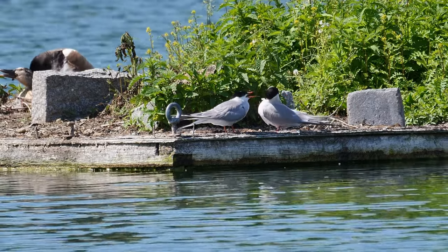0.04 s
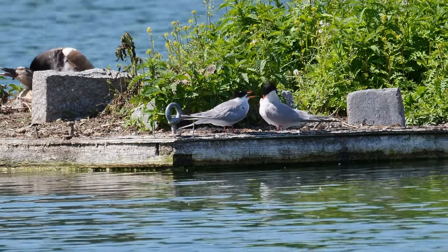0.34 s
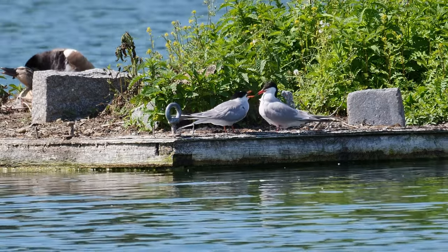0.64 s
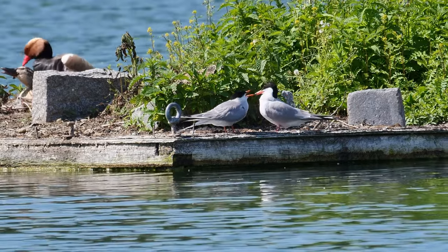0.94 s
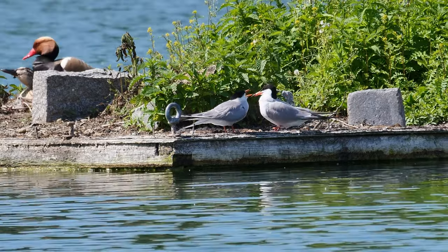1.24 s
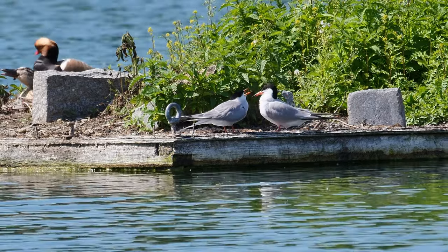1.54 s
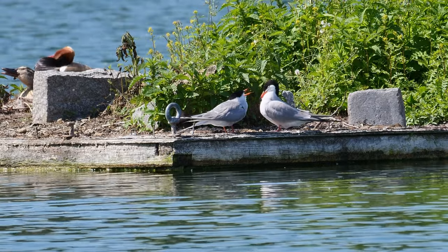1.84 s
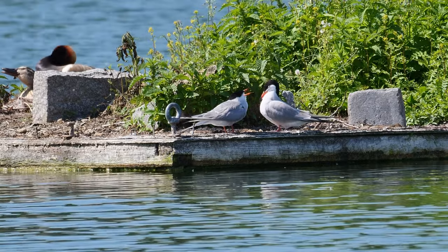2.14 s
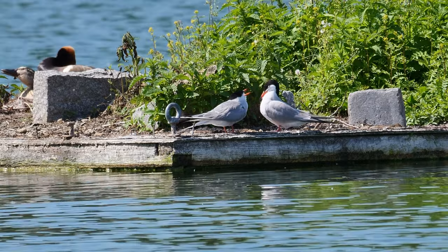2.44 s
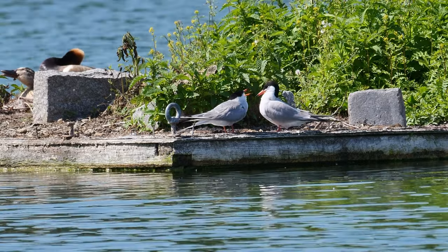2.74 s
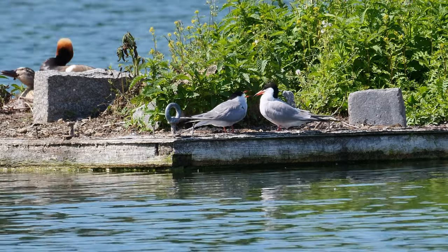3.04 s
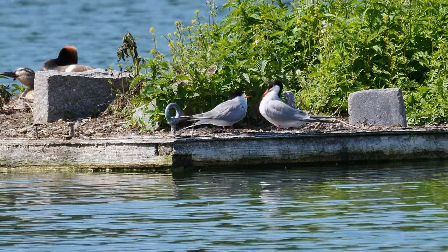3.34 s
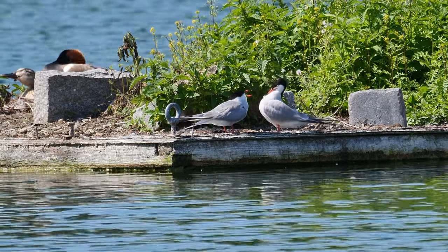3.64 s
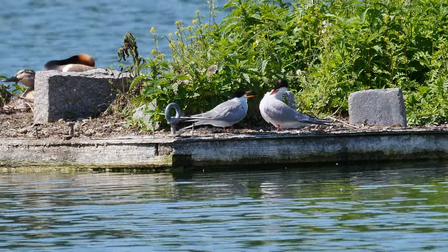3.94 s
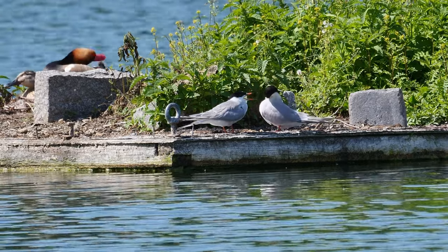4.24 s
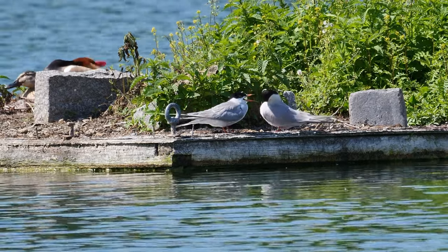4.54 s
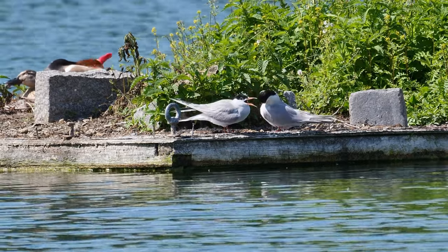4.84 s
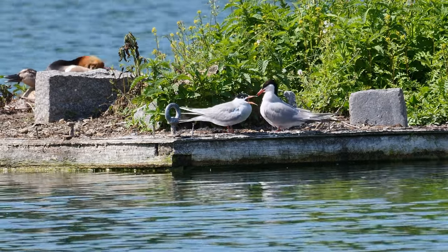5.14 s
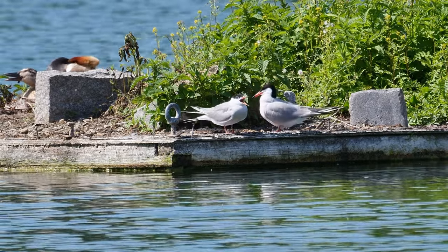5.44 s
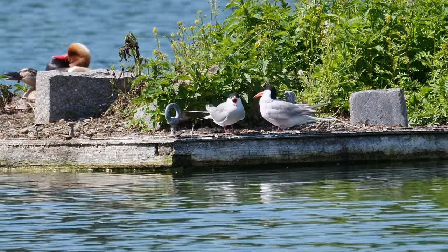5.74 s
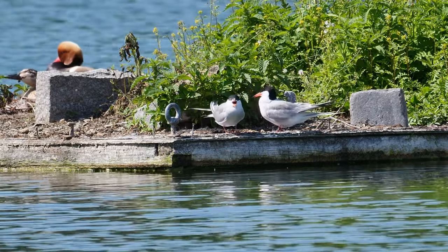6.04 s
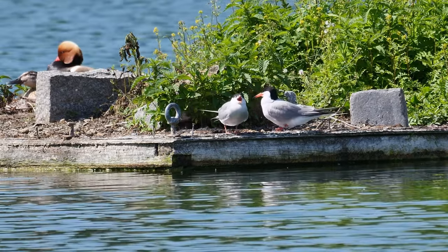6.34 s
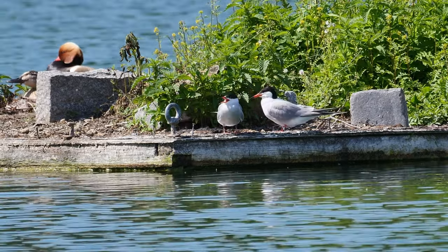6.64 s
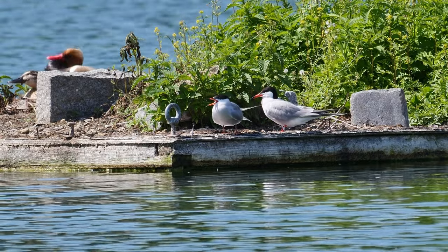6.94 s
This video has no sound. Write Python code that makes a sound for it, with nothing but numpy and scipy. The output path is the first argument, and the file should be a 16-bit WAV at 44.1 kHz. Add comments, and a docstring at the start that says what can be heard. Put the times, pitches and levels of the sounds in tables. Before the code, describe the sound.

Terns call from a raft on a lake, straight ahead of the microphone. A few short, sharp notes mix with three harsh trilled screeches, followed by a dry rattle that dies away about halfway through. Further off to the right, waterfowl give brief nasal croaks and songbirds trill and whistle with a light echo, growing busier near the end. A soft hush of leaves and water runs underneath.

```python
"""Two terns court on a raft in a lake: short "kip" notes, then trilled screeches and a dry rattle.
Each call is a whistled tone; under strain it breaks up into snaps of the membranes in the throat.
Further off, to the right, waterfowl croak with quick throat pulses and songbirds whistle among
echoing trees. Under it all lie a steady hush of leaves and water and a soft low rush."""
import sys
import numpy as np
from scipy import signal
from scipy.fft import rfft, irfft, next_fast_len
from scipy.io import wavfile

SR = 44100
rng = np.random.default_rng(int(sys.argv[2]) if len(sys.argv) > 2 else 0)


def unload_audio(sound):
    """Save the sound as a 16-bit wav file, at the path given as the first command line argument."""
    columns = np.transpose(np.atleast_2d(sound))
    # keep every value between -1 and 1, then stretch to whole-number steps
    steps = np.round(np.clip(columns, -1, 1) * 32767)
    wavfile.write(sys.argv[1], SR, steps.astype(np.int16))


N = 312228


def gain_of(db):
    """Decibels to gain."""
    return 10 ** (np.asarray(db) / 20)


def evened(x):
    """Scales to rms 1."""
    return x / np.sqrt(np.mean(x ** 2) + 1e-20)


def read(points, hz):
    """Reads a spectrum on a log-frequency axis."""
    f, value = np.transpose(points)
    return np.interp(np.log(hz + 1), np.log(f + 1), value)


def add(mix, s, sound):
    """Mixes a sound in at time s."""
    at = round(s * SR)
    sound = sound[max(-at, 0):]
    part = mix[max(at, 0):][:len(sound)]
    part += sound[:len(part)]


def wander(count, hz):
    """Smooth chance of rms 1, up to about hz."""
    size = next_fast_len(count + SR // 8)
    f = np.fft.rfftfreq(size, 1 / SR)
    return evened(irfft(rfft(rng.standard_normal(size)) * np.exp(-(f / hz) ** 2), size))[:count]


def impulse(points, size=1024):
    """The causal ring, of peak 1, of a body with this spectrum."""
    log_gain = np.log(gain_of(read(points, abs(np.fft.fftfreq(size, 1 / SR)))))
    ring = np.fft.ifft(np.exp(np.conj(signal.hilbert(log_gain)))).real[:size // 2]
    return ring / abs(ring).max()


def place(x, left_db, lag_ms):
    """A source to the right reaches the left microphone later and weaker."""
    lag = np.exp(-2j * np.pi * np.fft.rfftfreq(N, 1 / SR) * lag_ms / 10 ** 3)
    return np.array([gain_of(left_db) * irfft(rfft(x) * lag, N), x])


def echo(x, decays):
    """Many weak reflections, each band dying at its own speed."""
    taps = rng.standard_normal(SR) * (rng.random(SR) < .1)
    hz, t, z = signal.stft(taps, SR, nperseg=256)
    tail = signal.istft(z * gain_of(-60 * t / read(decays, hz)[:, None]), SR, nperseg=256)[1]
    return signal.fftconvolve(x, tail / np.linalg.norm(tail))[:N]


def noise(points):
    """Steady coloured noise of rms 1."""
    colour = gain_of(read(points, np.fft.rfftfreq(N, 1 / SR)))
    return evened(irfft(rfft(rng.standard_normal(N)) * colour, N))


# How strong the hush is from bass to treble: frequency_hz, relative_db
HUSH_COLOUR = [(25, -34), (80, -7), (200, -7.5), (350, -4.5), (600, -3), (1100, -4), (1450, -5.5),
               (1800, -7), (3000, -3), (4500, -2), (6000, -8), (8000, -13.5), (13500, -19)]
def steady_hush(level_db=-53, swell_db=.5, left_db=-12.5, shared=0.54):
    """Leaves and water make a steady noise, mostly on the right; the two ears share part of it."""
    right = noise(HUSH_COLOUR)
    left = gain_of(left_db) * (shared * right + np.sqrt(1 - shared ** 2) * noise(HUSH_COLOUR))
    return gain_of(level_db + swell_db * wander(N, 1.2)) * np.array([left, right])


# How the rush swells and sinks: time_s, level_db
RUSH_SWELL = [(0, -103), (.9, -62.5), (1.069, -56), (2.5, -60), (4.381, -59.5), (4.46, -68)]
# How strong the rush is from bass to treble: frequency_hz, relative_db
RUSH_COLOUR = [(25, -2), (80, -10.5), (180, -14), (350, 1.5), (520, 3.5), (850, -1.5), (1500, -3),
               (3200, -0.5), (5000, -21), (7000, -15), (11500, -18), (12500, -27)]
def low_rush():
    """A soft low noise from all round that comes up and sinks back."""
    level = gain_of(np.interp(np.arange(N) / SR, *np.transpose(RUSH_SWELL)))
    middle, side = noise(RUSH_COLOUR), 0.58 * noise(RUSH_COLOUR)
    return level * np.array([middle + side, middle - side])


# How long the echo among the trees takes to fade by 60 dB: frequency_hz, fade_s
WOODS_FADE = [(500, 0.7), (1400, 2), (3000, 1.25), (4800, 1.3), (7200, 1.08), (10000, 0.75)]
def woods_echo(sound):
    """The trees on the shore send back many weak reflections."""
    return echo(sound, WOODS_FADE)


# How loud a distant bird's trill is as it goes on: time_s, level_db
TRILL_LEVELS = [(2.7, -50), (3.0, -39), (3.5, -41), (3.8, -42), (4.1, -42), (4.45, -40.5), (4.58, -47.5),
                (4.66, -78)]
def distant_trill(chirps_per_s=15.0, top_hz=3180, droop=0.26):
    """One small arched chirp repeated fast, with an echo filling the gaps."""
    t = np.arange(N) / SR
    dip = np.sin(np.pi * chirps_per_s * (t - 4.4)) ** 2  # 0 mid-chirp, 1 between chirps
    hz = top_hz * (1 - droop * dip) * (1 + 0.0129 * wander(N, 163))
    chirps = np.sin(2 * np.pi * np.cumsum(hz) / SR) * (1 - dip)
    trill = chirps * gain_of(np.interp(t, *np.transpose(TRILL_LEVELS), left=-120, right=-120))
    return trill + gain_of(-2) * woods_echo(trill)


def progress(length_s):
    """Runs from 0 to 1 through a note."""
    return np.linspace(0, 1, int(length_s * SR))


# Songbird slides: start_s, length_s, first_hz, last_hz, bend (1 is straight), level_db, echo_db
SLIDE_NOTES = [(1.782, 0.21, 8840, 8200, 0.92, -67, -20), (3.726, 0.037, 6780, 5530, 1.5, -51, -10),
               (4.324, 0.079, 4300, 4400, 4.4, -42.5, -25), (5.466, .13, 5610, 5065, 4.44, -42.5, -0.5),
               (5.626, 0.28, 6830, 7200, 6.6, -48, -0.5), (5.706, 0.092, 7100, 5570, 1.2, -55.5, 12),
               (5.832, .36, 8920, 7940, 0.91, -57, -9), (5.943, 0.136, 7110, 6860, 3.84, -41.5, -7),
               (6.098, 0.116, 5110, 4770, 5.1, -39.5, 0), (6.475, 0.066, 7960, 7160, 0.81, -53, 8.5),
               (6.566, 0.12, 4320, 4142, 4.8, -42, -2), (6.872, .063, 7240, 3500, 1.73, -38, -4.5)]
def slides():
    """Whistles that slide to a new pitch; the greater the bend, the sooner they settle."""
    for start_s, length_s, first_hz, last_hz, bend, level_db, echo_db in SLIDE_NOTES:
        hz = last_hz + (first_hz - last_hz) * (1 - progress(length_s)) ** bend
        yield start_s, hz, level_db, echo_db


# Songbird chirps: start_s, length_s, top_hz, droop (share of pitch lost at the ends), level_db
ARCH_NOTES = [(4.969, 0.11, 3247, .14, -45), (5.763, 0.045, 2740, .1, -47.5),
              (5.824, .042, 3380, 0.2, -45.5), (6.521, 0.061, 7120, 0.24, -38.5)]
def arches(echo_db=-6):
    """Chirps whose pitch goes up and comes down again."""
    for start_s, length_s, top_hz, droop, level_db in ARCH_NOTES:
        hz = top_hz * (1 - droop * (2 * progress(length_s) - 1) ** 2)
        yield start_s, hz, level_db, echo_db


# A songbird's rising calls: start_s, level_db
RISING_NOTES = [(.43, -59.5), (.76, -54), (1.12, -49), (1.78, -55.5), (3.98, -50), (5.88, -53),
                (6.575, -49.5)]
def rising_calls(length_s=.1, first_hz=3030, last_hz=3830, echo_db=-2):
    """One upward glide, repeated now and then."""
    for start_s, level_db in RISING_NOTES:
        yield start_s, first_hz + (last_hz - first_hz) * progress(length_s), level_db, echo_db


# The falling notes that end the song: start_s, end_level_db
FALLING_NOTES = [(6.652, -41.5), (6.8, -45.5), (6.958, -40)]
def falling_calls(length_s=.125, first_hz=6580, last_hz=3580, swell_db=8.5, echo_db=8.5):
    """A repeated whistle that tips over and swells as it falls."""
    along = progress(length_s)
    hz = first_hz + (last_hz - first_hz) * along ** 1.7
    for start_s, end_level_db in FALLING_NOTES:
        yield start_s, hz, end_level_db - swell_db * (1 - along), echo_db


# How long sound scattered by the leaves takes to fade by 60 dB: frequency_hz, fade_s
LEAVES_FADE = [(2000, 0.05), (9000, 0.17)]
def songbirds(waver=0.0067, flicker_db=2.5):
    """Near-pure gliding whistles that linger among the trees."""
    direct, to_woods = np.zeros((2, N))
    for start_s, hz, level_db, echo_db in [*slides(), *arches(), *rising_calls(), *falling_calls()]:
        count = len(hz)
        whistle = np.sin(2 * np.pi * np.cumsum(hz * (1 + waver * wander(count, 370))) / SR)
        flicker = gain_of(flicker_db * wander(count, 59))
        note = gain_of(level_db) * evened(whistle * flicker * signal.windows.tukey(count, .25))
        add(direct, start_s, note)
        add(to_woods, start_s, gain_of(echo_db) * note)
    blurred = (direct + echo(direct, LEAVES_FADE)) / np.sqrt(2)  # half comes by way of the leaves
    return blurred + woods_echo(to_woods)


# Waterfowl croaks: start_s, length_s, pulses_per_s, throat_hz, level_db
CROAK_NOTES = [(-.02, 0.13, 188.4, 1468, -40.5), (0.929, 0.17, 202.9, 1464, -38),
               (2.08, 0.042, 168.4, 1280, -46.5), (2.217, 0.064, 170.5, 1127, -45),
               (2.924, 0.11, 173.2, 1470, -40), (3.195, 0.065, 169, 1260, -38.5),
               (4.135, 0.045, 225, 1350, -48.5), (5.079, .175, 150, 1442, -41),
               (5.409, 0.03, 183.2, 1242, -38.5), (5.439, 0.033, 177.3, 1380, -40.5),
               (6.982, 0.059, 196.7, 1140, -42.5)]
def waterfowl(ring_cycles=0.68, droop=0.0922, hoarse_db=2, echo_db=-10):
    """Quick pulses each ring the throat: a nasal croak whose pitch and ring rise and fall together."""
    croaks = np.zeros(N)
    for start_s, length_s, pulses_per_s, throat_hz, level_db in CROAK_NOTES:
        count = int(length_s * SR)
        arch = 1 - droop * np.linspace(-1, 1, count) ** 2
        cycle = np.cumsum(pulses_per_s * arch * (1 + .012 * wander(count, 150))) / SR % 1
        phase = 2 * np.pi * throat_hz / pulses_per_s * cycle + .25 * wander(count, 500)
        throat = np.sin(phase) + gain_of(-11) * np.sin(2 * phase) + gain_of(-21) * np.sin(3 * phase)
        pulses = throat * np.sin(np.pi * cycle) ** .5 * np.exp(-cycle / ring_cycles)
        pulses *= gain_of(hoarse_db * wander(count, 144))
        add(croaks, start_s, gain_of(level_db) * evened(pulses * signal.windows.tukey(count, .25)))
    return croaks + gain_of(echo_db) * woods_echo(croaks)


# How a tern's throat colours its sung tone: frequency_hz, relative_db
TONE_COLOUR = [(900, -16.5), (1500, -14), (2300, -0.5), (3100, 2), (3800, 2.5), (4500, 2), (5200, -2),
               (5800, -13.5), (6500, -12.5), (7600, -27), (10000, -30.5), (11600, -24.5), (12600, -66)]
def tern_tone(top_hz, tone_db, strain, trills, depth, sag=0.16, dip_db=11):
    """A whistle with overtones that sags in pitch and level once in every trill."""
    count = len(trills)
    dip = depth * abs(np.sin(np.pi * trills)) ** 2.6  # round tops, narrow troughs
    shake = 0.0063 * (1 + 3 * dip) + 0.06 * strain  # least steady in the troughs and under strain
    hz = top_hz * (1 - sag * dip) * (1 + shake * wander(count, 810))
    harmonics = np.arange(1, 10)[:, None]
    shimmer_db = np.array([wander(count, 39) for _ in harmonics])
    bright_db = np.maximum(tone_db + 18.5, 0) * (harmonics > 2)  # harder calls are shriller
    weights = gain_of(read(TONE_COLOUR, abs(harmonics * hz)) + bright_db + shimmer_db)
    waves = weights * np.sin(2 * np.pi * harmonics * np.cumsum(hz) / SR)
    loudness = gain_of(tone_db - dip_db * np.tanh((1.24 * dip) ** 2))
    return loudness * waves.sum(0) / np.sqrt((weights ** 2).sum(0) / 2)


# How a tern's throat colours its snaps: frequency_hz, relative_db
SNAP_COLOUR = [(330, -37.5), (580, -16), (900, -38), (1300, -6.5), (1650, -9.5), (1860, -6.5), (2200, -3),
               (3000, 2.5), (4100, 4), (5200, -4), (6300, -12), (7500, -23.5), (10000, -21.5), (11700, -27),
               (12600, -78)]
def tern_snaps(tone_db, strain, trills, slaps_per_s=170, flutter_db=-24, breath_db=-35):
    """The membranes snap just before and after the top of each trill, and flutter in between."""
    count = len(trills)
    snaps = np.zeros(count)
    for offset in (-.13, .13):  # share of one trill
        trill_number = np.floor(trills - offset + .04 * wander(count, 50))
        at = np.flatnonzero(np.diff(trill_number) > 0)
        snaps[at] = gain_of(rng.standard_normal(len(at)))
    stray_slaps = (rng.random(count) < slaps_per_s / SR) * rng.uniform(-1.37, 1.0, count)
    flutter = gain_of(flutter_db + 2.46 * wander(count, 31)) * np.cos(np.pi * trills) ** 4
    hiss = (strain * flutter + gain_of(breath_db + tone_db)) * rng.standard_normal(count)
    return signal.fftconvolve(strain * (snaps + stray_slaps) + hiss, impulse(SNAP_COLOUR))[:count]


def tern_voice(top_hz, tone_db, snap_db, trills, depth):
    """Tone and snaps from one throat; trills is a running count, a whole number at each trill's top."""
    strain = gain_of(snap_db)
    voice = tern_tone(top_hz, tone_db, strain, trills, depth) + tern_snaps(tone_db, strain, trills)
    return voice * signal.windows.tukey(len(trills), .02)


def ramp(t, start_s, length_s):
    """Goes from 0 to 1 over length_s."""
    return np.clip((t - start_s) / length_s, 0, 1)


# Short "kip" notes; the second runs straight into a screech: start_s, length_s, rise_s, top_hz,
# flat (share below the top at first), level_db, final_drop (0-1), catch (0-1)
KIP_CALLS = [(1.224, 0.039, 0.0203, 1543, 0.09, -15.5, 0.91, 0),
             (1.444, 0.042, 0.0202, 1548, .09, -14.5, 0.32, 0.03),
             (1.964, 0.09, 0.055, 1638, .16, -18, 0.9, 0.41)]
def kip(length_s, rise_s, top_hz, flat, level_db, final_drop, catch, snap_db=-55):
    """One clean arch of pitch and level; the voice may catch briefly just before the top."""
    catch_lead_s, catch_s = 0.0136, 0.0048
    t = np.arange(0, length_s, 1 / SR)
    below_top = (1 - ramp(t, 0, rise_s)) ** 1.58
    drop = final_drop * ramp(t, rise_s, length_s - rise_s) ** 2
    hz = top_hz * (1 - flat * below_top - .3 * drop)
    tone_db = level_db - 12.5 * np.exp(-t / 0.011) - 25 * drop
    one_dip = ramp(t, rise_s - catch_lead_s - 2 * catch_s, 4 * catch_s)
    return tern_voice(hz, tone_db, snap_db, one_dip, depth=catch)


# Trilled screeches: start_s, length_s, scoop_s, pitch_hz, climb_hz_per_s, tone_db, swell_db_per_s,
# first_trills_per_s, break_s (into the call), break_width_s, break_loss_db, snap_db
SCREECH_CALLS = [(1.486, 0.2, 0.00293, 1526, 1051.5, -18.5, 20.5, 56, .16, 0.0074, 8, -12),
                 (2.205, 0.28, 0.0081, 1652, 449, -15.5, -10, 50, .188, 0.0073, 7.5, -9.5),
                 (2.631, 0.3, .026, 1711, -1250, -13.5, 17.5, 80, .2, .024, 12, -10.5)]
def screech(length_s, scoop_s, pitch_hz, climb_hz_per_s, tone_db, swell_db_per_s, first_trills_per_s,
            break_s, break_width_s, break_loss_db, snap_db):
    """The tone scoops up and trills, then breaks: pitch and tone collapse and snaps take over."""
    settled_trills_per_s, settle_s = 72, .1
    broken_hz, fade_db_per_s, strain_lead_s = 1092, 68, .012
    t = np.arange(0, length_s, 1 / SR)
    scoop = np.exp(-t / scoop_s)  # starts flat and soft
    unbroken = (1 - np.tanh((t - break_s) / (2 * break_width_s))) / 2
    relaxed = (1 - np.tanh((t + strain_lead_s - break_s) / (2 * break_width_s))) / 2
    uneven = wander(len(t), settled_trills_per_s)  # no two trills are quite alike
    sung_hz = (pitch_hz + climb_hz_per_s * t) * (1 - 0.16 * scoop)
    hz = (unbroken * sung_hz + (1 - unbroken) * broken_hz) * (1 + 0.0049 * uneven)
    sung_db = tone_db - 14.5 * scoop + swell_db_per_s * t * unbroken + 0.64 * uneven
    ending_db = 14 * ramp(t, length_s - 0.033, 0.033)
    lost_db = break_loss_db * (1 - unbroken) + fade_db_per_s * np.maximum(t - break_s, 0) + ending_db
    rate = settled_trills_per_s + (first_trills_per_s - settled_trills_per_s) * np.exp(-t / settle_s)
    trills = .5 + np.cumsum(rate) / SR  # starts in a trough
    depth = (rate / settled_trills_per_s) ** 1.2  # slow trills are shallower
    return tern_voice(hz, sung_db - lost_db, snap_db - 46 * relaxed ** 2 - ending_db, trills, depth)


# Dry rattles, broken from the start: start_s, length_s, hold_s, trills_per_s, snap_db, tone_db
RATTLE_CALLS = [(3.045, 0.22, 0.12, 79, -9.5, -25.5), (3.367, .05, 0.018, 77.4, -9, -28),
                (3.504, .063, 0.025, 63, -10.5, -28)]
def rattle(length_s, hold_s, trills_per_s, snap_db, tone_db, pitch_hz=971):
    """Pairs of snaps over a weak, fitful low tone: they build, hold, and sink to a mutter."""
    t = np.arange(0, length_s, 1 / SR)
    soft_start = 1 - ramp(t, 0, length_s=0.028)
    effort_db = -3 * soft_start - 13.5 * ramp(t, hold_s, length_s=0.034)
    fitful_db = tone_db + 1.5 * wander(len(t), hz=35) - 14.5 * soft_start
    return tern_voice(pitch_hz, fitful_db + effort_db, snap_db + effort_db, trills_per_s * t, depth=1)


# How long sound scattered by raft and water takes to fade by 60 dB: frequency_hz, fade_s
RAFT_FADE = [(500, 0.19), (3000, 0.14), (10000, 0.024)]
def terns(scatter_db=-20, shore_db=-32):
    """The pair on the raft, nearly straight ahead, with close scatter and a faint shore echo."""
    calls = np.zeros(N)
    for call, table in (kip, KIP_CALLS), (screech, SCREECH_CALLS), (rattle, RATTLE_CALLS):
        for start_s, *shape in table:
            add(calls, start_s, call(*shape))
    echoes = [gain_of(scatter_db) * echo(calls, RAFT_FADE) + gain_of(shore_db) * woods_echo(calls)
              for ear in range(2)]
    return place(calls, left_db=-0.5, lag_ms=0.033) + np.array(echoes)


def scene():
    """Terns in front, the other birds on the right-hand shore, hush and rush behind them."""
    shore = waterfowl() + songbirds() + distant_trill()
    return terns() + place(shore, left_db=-13.5, lag_ms=0.1) + steady_hush() + low_rush()


def record(dry):
    """Cuts away the highest treble, above 13850 Hz."""
    treble_cut = signal.firwin(511, 13850, window=("kaiser", 9), fs=SR)
    return signal.oaconvolve(dry, treble_cut[None], "same")


dry = scene()
out = record(dry)
unload_audio(out)
```